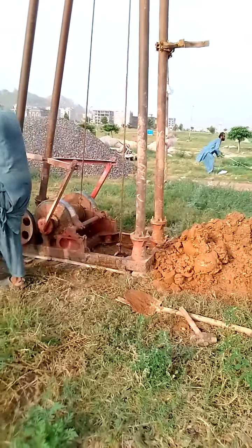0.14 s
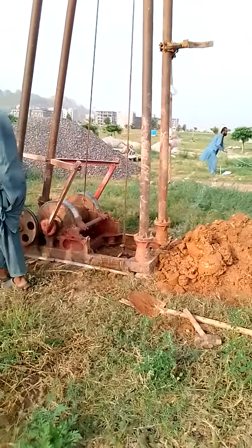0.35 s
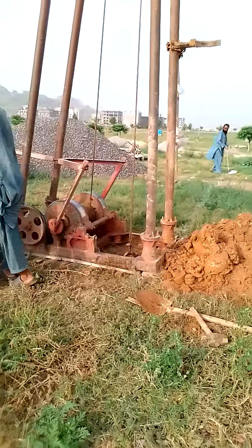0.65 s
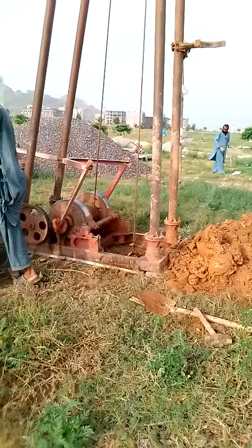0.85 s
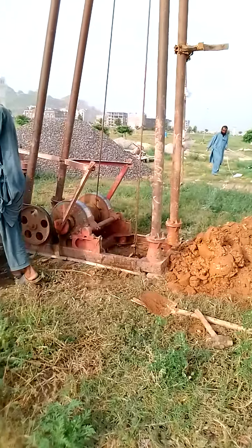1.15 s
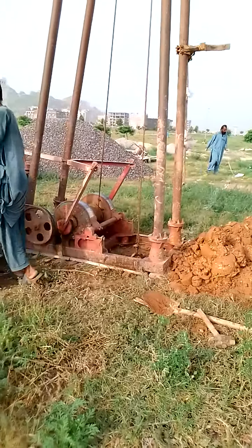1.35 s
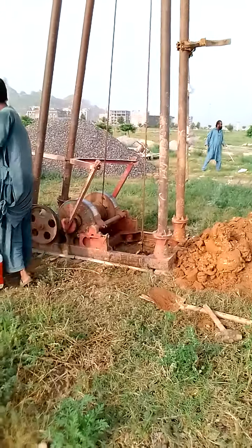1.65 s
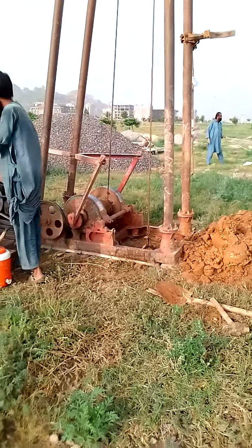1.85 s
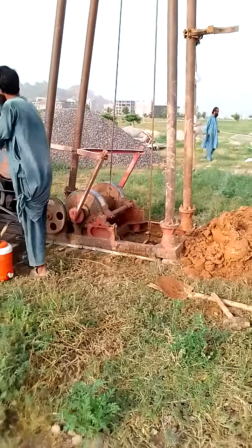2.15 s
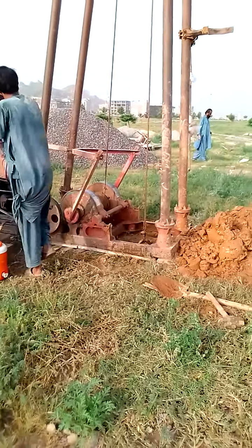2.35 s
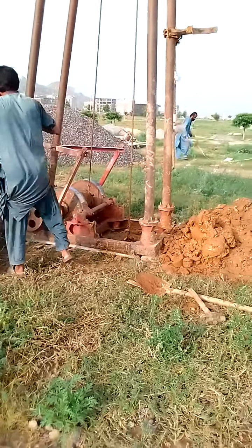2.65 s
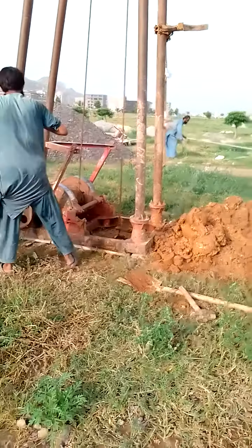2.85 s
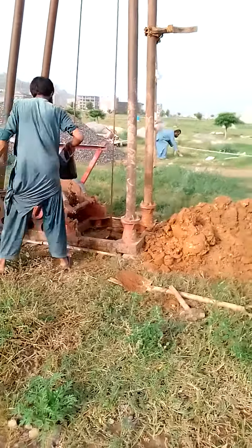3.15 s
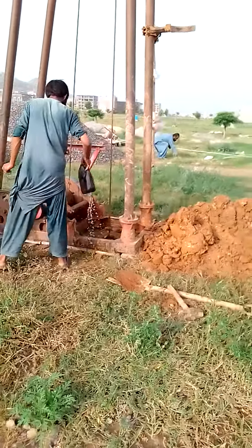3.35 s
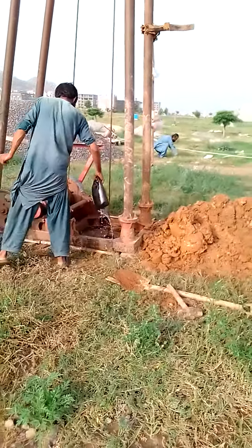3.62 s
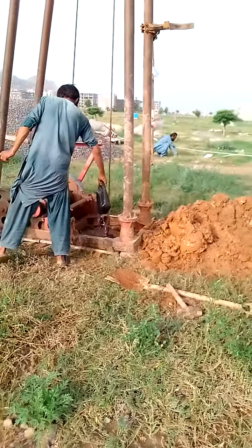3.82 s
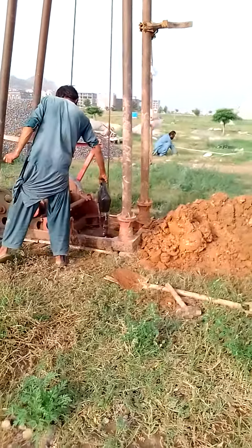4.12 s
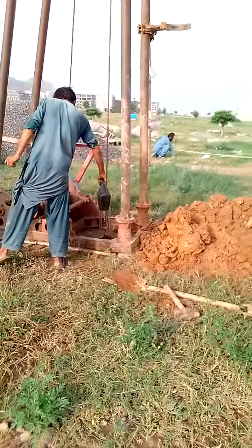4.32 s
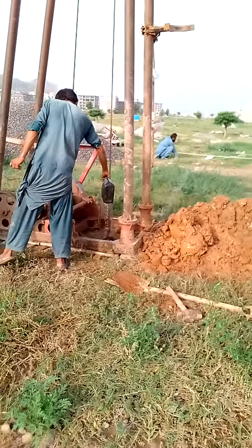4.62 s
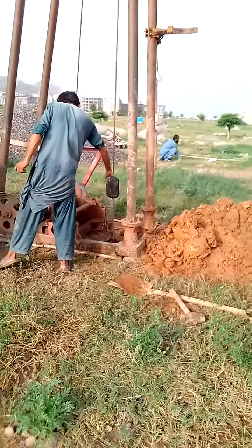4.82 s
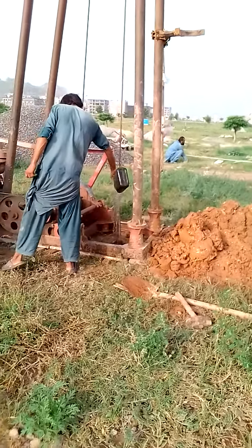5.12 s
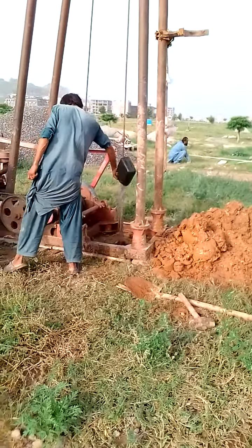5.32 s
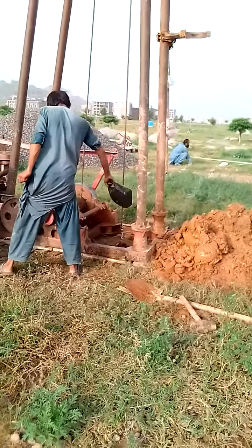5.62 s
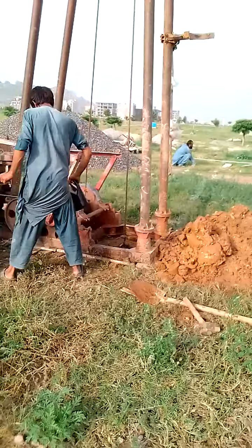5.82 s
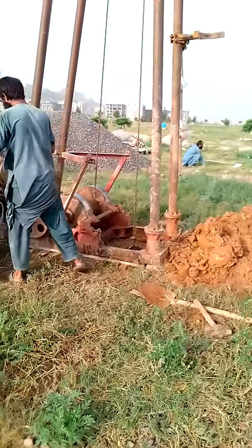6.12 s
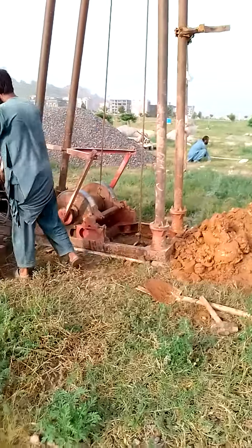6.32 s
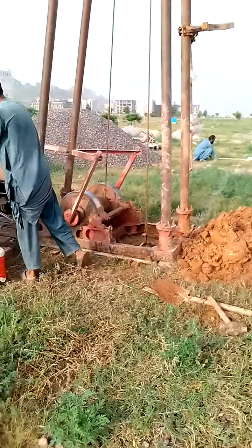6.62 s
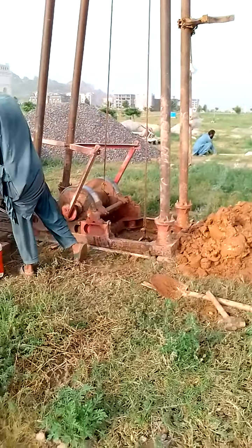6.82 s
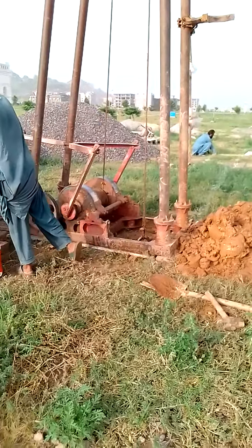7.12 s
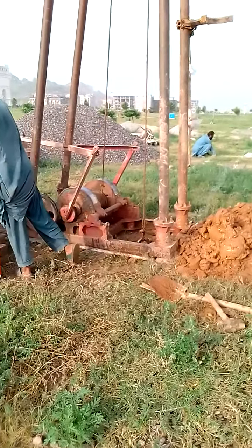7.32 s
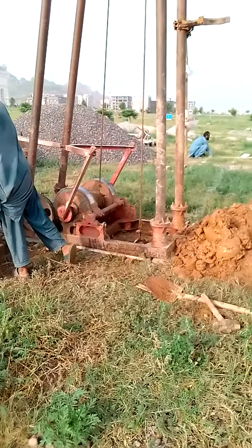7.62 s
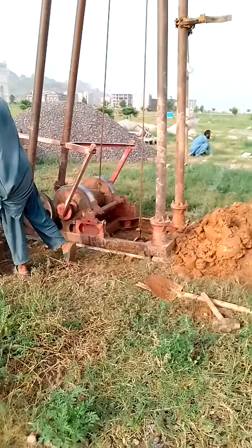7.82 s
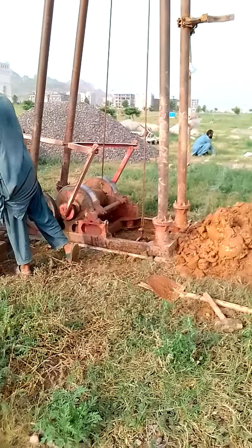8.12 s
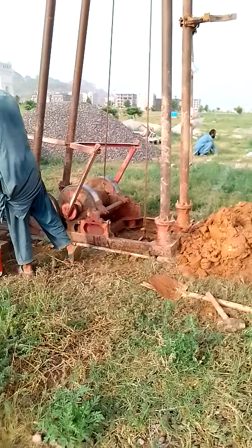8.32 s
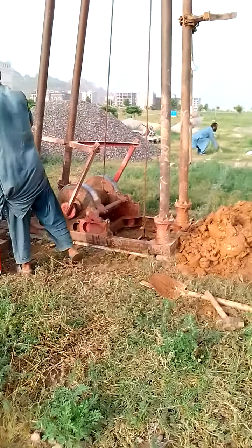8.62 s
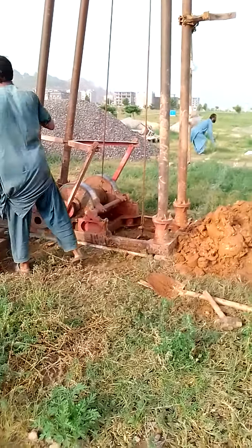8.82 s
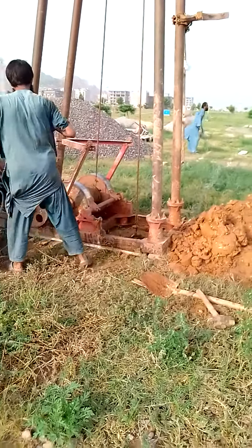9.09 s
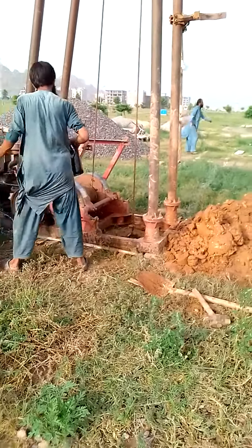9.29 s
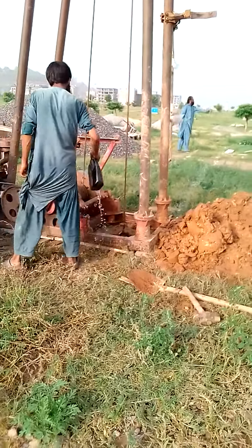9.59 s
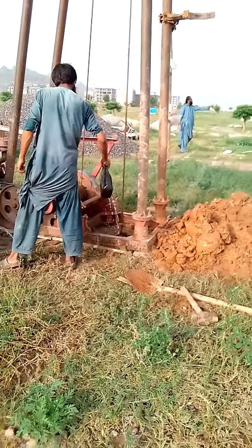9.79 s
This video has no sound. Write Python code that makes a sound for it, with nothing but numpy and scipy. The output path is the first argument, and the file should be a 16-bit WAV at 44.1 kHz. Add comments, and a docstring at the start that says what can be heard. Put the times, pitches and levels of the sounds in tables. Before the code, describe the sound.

A small one-cylinder diesel engine runs from start to finish, about ten seconds, driving a drilling rig's winch nearby in an open field. It chugs hard and evenly at four to five beats a second. Each beat combines a hollow exhaust puff, a valve clack, a sharp knock and a light tick, with a faint fizz of gas. The iron body rings with the blows, and gears and belt rattle underneath. Firings often alternate between weaker and stronger while the pace holds. A loose steel cover adds a thin, high ringing buzz, strongest at the start, around 2 seconds and near the end. At about 2.7 seconds one brief, bright metal clank cuts through. The treble softens slightly from about 0.5 to 3 seconds and from 6 to 9.5 seconds, as a worker blocks the engine. It is still running at the end.

```python
"""A hard diesel chug, 4.6 firings a second: a one-cylinder four-stroke drives a drilling rig's winch in a field.
In each cycle the exhaust puffs through its silencer, the valve gear clacks, the fuel knocks and a tappet
ticks. The blows ring the engine's iron, a loose cover sings, and gears and belt rattle underneath.
The governor hunts between weak and strong firings. Twice the operator steps in front and screens
the treble; once, a bright clank cuts through."""
import sys
import numpy as np
from scipy import signal
from scipy.fft import rfft, irfft
from scipy.io import wavfile

SR = 44100
rng = np.random.default_rng(int(sys.argv[2]) if len(sys.argv) > 2 else 0)


def master_out(mix):
    """Clip the mix to full scale and print it as 16-bit PCM to the path in sys.argv[1]."""
    frames = np.transpose(np.atleast_2d(mix))
    ceiling = np.clip(frames, -1, 1)
    pcm = np.round(ceiling * 32767).astype(np.int16)
    wavfile.write(sys.argv[1], SR, pcm)


N = 438794
T = np.arange(N) / SR
BLOW_T = np.arange(SR // 6) / SR  # time within one blow [s]
FIRST_EXHAUST_S, OPERATOR_STEP_S = -.0438, .6

# hollow voice of the silencer: (pitch [Hz], width [Hz], level [dB], polarity [+1 or -1])
SILENCER_MODES = [(140.3, 17, -20, 1), (192.2, 45, -13, 1), (256.2, 41.6, 4, 1), (308, 69, 3, -1),
                  (585, 77, -2.5, -1), (725, 73, -8, 1)]
# ring of block, flywheel and covers: (pitch [Hz], width [Hz], level over the direct sound [dB])
IRON_MODES = [(579.6, 5.3, 2), (695.5, 12.2, 3.5), (735, 9.2, -0.5), (863, 45, -5.5), (1004, 57, -6.5),
              (1205, 54, -3), (1456, 12, -27), (2007, 27, -2), (2880, 87, 4), (3019, 40, 2),
              (3652, 47, 1.5), (3917, 37, -3.5), (3940, 180, -8), (4414, 82, 2), (4450, 39, -5.5),
              (5395, 84, -3.5), (6180, 67, 7)]
# ring of the clank: (pitch [Hz], decay [ms], level [dB])
CLANK_MODES = [(3623, 8, -15), (4533, 10, -14), (4710, 11, -14), (5050, 12, -15)]

# tone colour of each noisy layer: (frequency [Hz], relative level [dB])
CLATTER_EQ = [(100, 6.5), (300, 3), (480, -1), (800, 6), (1300, -2), (2000, -7.5), (2600, -3), (3200, -2),
              (4500, 0.5), (5500, -5), (7200, -25), (16000, -33.5)]
GEAR_EQ = [(25, -14), (60, -14), (125, -7.5), (160, -17), (225, 4), (330, 7.5), (470, -4.5), (750, 0.5),
           (1100, -3.5), (1900, -11.5), (3200, -11), (4800, -13), (7200, -36.5), (16000, -36)]
VALVE_EQ = [(100, -2.5), (300, 9.5), (450, -3), (530, 4.5), (900, -4.5), (1400, -5.5), (2400, -8.5),
            (3500, -4), (4500, 6), (5400, -6), (7300, -26), (16000, -20.5)]
SIZZLE_EQ = [(2000, -22), (5000, 7), (6400, 6), (7500, -3.5), (8700, 1), (10500, -4), (12500, 3),
             (15000, 7), (16000, -3)]
CRACK_EQ = [(300, -24.5), (800, 2), (1300, 8), (2000, -7), (2500, -4.5), (3000, 5.5), (4200, 3), (5400, 0),
            (6500, -21.5), (8000, -21.5), (11000, -29), (15500, -22)]
CRANKCASE_EQ = [(150, -17.5), (330, -4), (480, -15.5), (620, -6), (780, 5.5), (1000, -6.5), (1270, -6.5),
                (1600, -26.5), (2500, -11.5), (6000, -52)]
BUZZ_EQ = [(1500, -21), (3000, -7), (3800, 1.5), (5000, -3), (7000, -18), (16000, -19)]
CLANK_EQ = [(1000, -25), (2800, -16), (3600, 6), (4200, -4), (5200, 2), (7000, -17), (13000, -17),
            (16000, -25)]

# metal blows and gas bursts of one cycle:
# (delay after the exhaust opens [ms], rise [ms], decay [ms], relative level [dB])
CLATTER_HITS = [(-14, 2.9, 15, -52.5), (-2.5, 3.96, 9.2, -44.5), (4.5, 4.2, 11.5, -45.5)]
VALVE_HITS = [(52, 2.8, 7.8, -64), (59.3, 3.1, 4.1, -48.5), (63.4, 2.7, 4.4, -51.5), (96, 0.83, 3.2, -69)]
SIZZLE_BURSTS = [(-2.5, 1.5, 6.7, -55.5), (107.5, 5.5, 6.7, -66), (150.5, .5, 3.7, -65),
                 (155.5, 10, 1.5, -59.5), (177, 9.5, 24, -71.5)]
SPIT_BURSTS = [(59.8, 1.6, 5.8, -54.5), (97, .4, 1, -74)]
CRACK_HITS = [(106.2, 2.2, 4.6, -45), (109.5, 2.3, 4.9, -46.5), (115.9, 2.9, 6.5, -48.5),
              (124.6, 3.5, 31, -58.5)]
CRANKCASE_HITS = [(111.8, 5.4, 6.5, -44), (125, 5.2, 30, -56)]
TAPPET_HITS = [(153.4, 2.8, 6, -51.5), (152.8, 1.4, 11.4, -56)]

# crankshaft tempo, held by the governor: (time [s], speed [rev/min])
CRANK_SPEED = [(0.0, 560.2), (2.4, 557.3), (2.6, 574.0), (2.8, 554.7), (4.2, 558.5), (4.4, 552.3),
               (4.8, 562.4), (6.6, 553.5), (6.8, 559.3), (8.6, 551.5), (8.8, 556.1), (9.8, 553.3)]
# the governor hunts, weak and strong firings alternate, weak first: (start [s], end [s], depth [0-1])
GOVERNOR_HUNTS = [(.5, 1.55, .7), (1.55, 2.45, .8), (2.65, 3.7, .8), (3.7, 4.6, .8), (4.8, 5.2, .5),
                  (5.85, 8.0, .9), (8.45, 10, 1)]
# the operator stands in front of the engine: (steps in [s], steps out [s])
OPERATOR_IN_FRONT = [(.45, 3.0), (6.15, 9.35)]

# how hard each part plays in a cycle:
# (trim [dB], change at full fuel [dB], loss behind the operator [dB], random scatter [dB])
CLATTER_MIX = (.4, .2, 1.6, .7)
VALVE_MIX = (1.6, -.6, .8, 1.8)
SIZZLE_MIX = (1.4, 2.3, 4.2, 1.1)
SPIT_MIX = (4.7, .3, 5.6, 1.1)
MOUNT_MIX = (-2.5, 9.5, 1.1, 2.5)
CRACK_MIX = (2.6, 1.2, .8, 1.3)
CRANKCASE_MIX = (2.7, 2.2, 1.7, 1.2)
TAPPET_MIX = (4.4, 1.1, 3.4, 1.4)

# the loose steel cover's lower and upper note: (base level [dB], loss behind the operator [dB])
COVER_NOTES = [(-69, 1.5), (-68, 4.5)]
# the cover rattles harder: (time [s], half length [s], lower note change [dB], upper note change [dB])
COVER_FLARES = [(0, .7, 18, -4), (2.2, .45, 13, -5), (4.6, .7, 1.5, 6), (6.25, .6, 7, 1.5),
                (9.7, .5, 7, 16)]


def undb(db):
    """Decibels to gain."""
    return 10 ** (np.asarray(db) / 20)


def colour(x, eq, size=4096):
    """Minimum-phase EQ that keeps the power of white noise."""
    hz, db = np.transpose(eq)
    gain = undb(np.interp(np.log(np.fft.rfftfreq(size, 1 / SR) + 1), np.log(hz), db))
    cepstrum = irfft(np.log(gain))
    # folded forward, so nothing sounds ahead of an attack
    cepstrum[1:size // 2] *= 2
    cepstrum[size // 2 + 1:] = 0
    response = irfft(np.exp(rfft(cepstrum)))
    return signal.oaconvolve(x, response / np.linalg.norm(response))[:len(x)]


def resonate(x, hz, width):
    """One resonance, gain 1 at its centre."""
    return signal.lfilter(*signal.iirpeak(hz, hz / width, fs=SR), x)


def envelope(rise_ms, decay_ms):
    """A smooth attack to 1, then an exponential tail."""
    ms = BLOW_T * 1000
    attack = np.sin(np.pi / 2 * np.minimum(ms / rise_ms, 1)) ** 2
    return attack * np.exp(-np.maximum(ms - rise_ms, 0) / decay_ms)


def thump(hz, rise_ms, decay_ms):
    """A damped tone with a rounded attack."""
    return envelope(rise_ms, decay_ms) * np.sin(2 * np.pi * hz * BLOW_T)


def trigger(shape, times, db):
    """Plays the same shape at each time, each at its own level."""
    out = np.zeros(N + 2 * SR)  # a spare second at each end
    for start, gain in zip(((times + 1) * SR).astype(int), undb(db) * np.ones(len(times))):
        out[start:start + len(shape)] += gain * shape
    return out[SR:SR + N]


def scatter(times, spread):
    """One random offset for each cycle."""
    return spread * rng.standard_normal(len(times))


def after(times, delay_ms, jitter_ms):
    """Moments a set delay later, each a little early or late."""
    return times + (delay_ms + scatter(times, jitter_ms)) / 1000


def grit(spread_db, grain_samples=24):
    """Dense tiny impacts: noise in grains of scattered level, rms 1."""
    sizes = undb(spread_db * np.clip(rng.standard_normal(N // grain_samples + 1), -1.6, 1.6))
    grains = rng.standard_normal(N) * np.repeat(sizes, grain_samples)[:N]
    return grains / grains.std()


def bursts(times, db, pattern, eq, spread_db, jitter_ms, scatter_db=.5):
    """A pattern of hits in every cycle, each a burst of coloured grit."""
    energy = 0
    for delay, rise, decay, hit_db in pattern:
        level_db = db + hit_db + scatter(times, scatter_db)
        energy += trigger(envelope(rise, decay), after(times, delay, jitter_ms), level_db) ** 2
    return colour(np.sqrt(energy) * grit(spread_db), eq)


def cycle_times():
    """The beat: the exhaust valve opens once in two turns of the crankshaft."""
    seconds = FIRST_EXHAUST_S + np.arange(N + SR // 10) / SR
    rpm = np.interp(seconds, *np.transpose(CRANK_SPEED))
    cycles = np.cumsum(rpm) / (2 * 60 * SR)
    return np.interp(np.arange(int(cycles[-1]) + 1), cycles, seconds)


def fuelling(times):
    """How much fuel the governor gives each firing: -1 weak, 0 even, 1 strong."""
    fuel = np.zeros(len(times))
    for start, end, depth in GOVERNOR_HUNTS:
        inside = (times >= start) & (times < end)
        fuel = np.where(inside, depth * np.cos(np.pi * np.cumsum(inside)), fuel)
    return fuel


def screened(times):
    """How far the operator covers the engine, 0-1."""
    return sum(np.clip(np.minimum(times - start, end - times) / OPERATOR_STEP_S + .5, 0, 1)
               for start, end in OPERATOR_IN_FRONT)


def accents(times, mix):
    """A part's accent per cycle in dB: it moves with the fuel and by chance, and ducks when screened."""
    trim_db, fuel_db, screen_db, scatter_db = mix
    return trim_db + fuel_db * fuelling(times) - screen_db * screened(times) + scatter(times, scatter_db)


def exhaust(times, push_ms=1.16, echo_ms=9.314, echo_gain=.65, db=-32):
    """A push of gas rings the silencer; one reflection follows and hollows the tone."""
    age = BLOW_T * 1000 / push_ms
    push = age * np.exp(-age)
    puff = sum(polarity * undb(mode_db) * resonate(push, hz, width)
               for hz, width, mode_db, polarity in SILENCER_MODES)
    puff += echo_gain * np.interp(BLOW_T - echo_ms / 1000, BLOW_T, puff, left=0)
    return trigger(puff / np.abs(puff).max(), after(times, 2.6, 0), db + scatter(times, .47))


def clatter(times):
    """Three metal blows crowd around the opening of the exhaust."""
    db = accents(times, CLATTER_MIX)
    return bursts(times, db, CLATTER_HITS, CLATTER_EQ, spread_db=2.5, jitter_ms=.48)


def gears():
    """The bed: gears and belt rattle all the time, swelling a little."""
    swell = np.interp(T, np.linspace(0, T[-1], 200), rng.standard_normal(200))
    return colour(grit(spread_db=0), GEAR_EQ) * undb(-56 + 2.6 * swell)


def gas_sizzle(times):
    """Gas fizzes past the valves as they open and spits as one shuts, over a faint hiss."""
    fizz_db, spit_db = accents(times, SIZZLE_MIX), accents(times, SPIT_MIX)
    fizz = bursts(times, fizz_db, SIZZLE_BURSTS, SIZZLE_EQ, spread_db=1.5, jitter_ms=.44)
    spit = bursts(times, spit_db, SPIT_BURSTS, SIZZLE_EQ, spread_db=3, jitter_ms=.27)
    hiss = colour(rng.standard_normal(N), SIZZLE_EQ) * undb(-76 + .39 * np.interp(T, times, fizz_db))
    return fizz + spit + hiss


def valve_clack(times):
    """The valve gear strikes in a quick cluster after each puff."""
    db = accents(times, VALVE_MIX)
    return bursts(times, db, VALVE_HITS, VALVE_EQ, spread_db=2.5, jitter_ms=1)


def cover_gains():
    """Faders for the cover's two notes: they duck behind the operator and move with each flare."""
    lower_db, upper_db = (db - screen_db * screened(T) for db, screen_db in COVER_NOTES)
    for at, half_s, lower_change_db, upper_change_db in COVER_FLARES:
        swell = np.cos(np.pi / 2 * np.minimum(np.abs(T - at) / half_s, 1))
        lower_db += lower_change_db * swell
        upper_db += upper_change_db * swell
    return undb(lower_db), undb(upper_db)


def loose_cover(times, lower_hz=4405, upper_hz=4795, width_hz=100, buzz_db=-2):
    """Valve and tappet shake the cover: two narrow modes sing after each tick, inside a broad buzz."""
    valve_shake = trigger(envelope(rise_ms=2, decay_ms=11.4), after(times, 59, .5), db=2)
    tappet_shake = trigger(envelope(rise_ms=2, decay_ms=47), after(times, 153, .55), db=0)
    lower, upper = cover_gains()
    ring = undb(buzz_db) * upper * colour(rng.standard_normal(N), BUZZ_EQ)
    for hz, gain in (lower_hz, lower), (upper_hz, upper):
        note = resonate(resonate(rng.standard_normal(N), hz, width_hz), hz, width_hz)
        ring += gain * note / note.std()
    return (valve_shake + tappet_shake) * ring


def shudder(times):
    """The weight of a cycle: a valve thuds, the firing shakes the mounts twice, a low throb follows."""
    mount_db = accents(times, MOUNT_MIX)
    thud = trigger(thump(216, rise_ms=3.2, decay_ms=7.4), after(times, 60.44, .54), -56.5)
    shake = trigger(thump(330.4, rise_ms=15, decay_ms=8.5), after(times, 111, .34), -47 + .5 * mount_db)
    shake += trigger(thump(306.4, rise_ms=6.4, decay_ms=7.5), after(times, 124, .49), -49.5 + mount_db)
    throb_db = -59 + scatter(times, 1.4)
    throb = trigger(thump(70.3, rise_ms=20, decay_ms=9.7), after(times, 153.6, .81), throb_db)
    return thud + shake + throb


def knock(times, crankcase_db):
    """The fuel ignites with a crack, piston and bearings slap; the crankcase answers later and lower."""
    crack = bursts(times, accents(times, CRACK_MIX), CRACK_HITS, CRACK_EQ, spread_db=2, jitter_ms=.81)
    body = bursts(times, crankcase_db, CRANKCASE_HITS, CRANKCASE_EQ, spread_db=1, jitter_ms=.9)
    return crack + body


def flywheel(times, crankcase_db, low_hz=592, high_hz=690):
    """Each firing sets the flywheel ringing; the lower mode lasts into the next stroke."""
    low = undb(-62) * thump(low_hz, rise_ms=14, decay_ms=48)
    high = undb(-58) * thump(high_hz, rise_ms=5.2, decay_ms=19)
    return trigger(low + high, after(times, 120, 1.57), .96 * crankcase_db)


def tappet_tick(times):
    """A tappet strikes late in the cycle, in the tone colour of the valve gear."""
    db = accents(times, TAPPET_MIX)
    return bursts(times, db, TAPPET_HITS, VALVE_EQ, spread_db=2.5, jitter_ms=.55)


def clank(at_s=2.678, db=-36):
    """One bright metal clank as the operator reaches over the winch."""
    cue = np.array([at_s])
    force = trigger(envelope(rise_ms=.8, decay_ms=3.5), cue, db) * np.sign(rng.standard_normal(N))
    ring = sum(undb(mode_db) * thump(hz, .82, decay) for hz, decay, mode_db in CLANK_MODES)
    return colour(force, CLANK_EQ) + trigger(ring, cue, db)


def ring_iron(metal):
    """Blows and rattle all ring the same iron: its modes add to the direct sound."""
    return metal + sum(undb(db) * resonate(metal, hz, width) for hz, width, db in IRON_MODES)


def scene():
    """The mono mix: ringing iron in the middle, puffs and thumps below, fizz and bright metal on top."""
    times = cycle_times()
    crankcase_db = accents(times, CRANKCASE_MIX)  # knock and flywheel share their accents
    metal = clatter(times) + gears() + valve_clack(times) + knock(times, crankcase_db) + tappet_tick(times)
    lows = exhaust(times) + shudder(times) + flywheel(times, crankcase_db)
    highs = gas_sizzle(times) + loose_cover(times) + clank()
    return (undb(-3) * ring_iron(metal) + lows + highs)[None]


def record(dry, low_hz=72, top_hz=16000):
    """The phone thins the deep bass and cuts the top."""
    thin = signal.sosfilt(signal.butter(2, low_hz, "highpass", fs=SR, output="sos"), dry)
    return signal.sosfilt(signal.ellip(10, .2, 70, top_hz, fs=SR, output="sos"), thin)


dry = scene()
out = record(dry)
master_out(out)
```